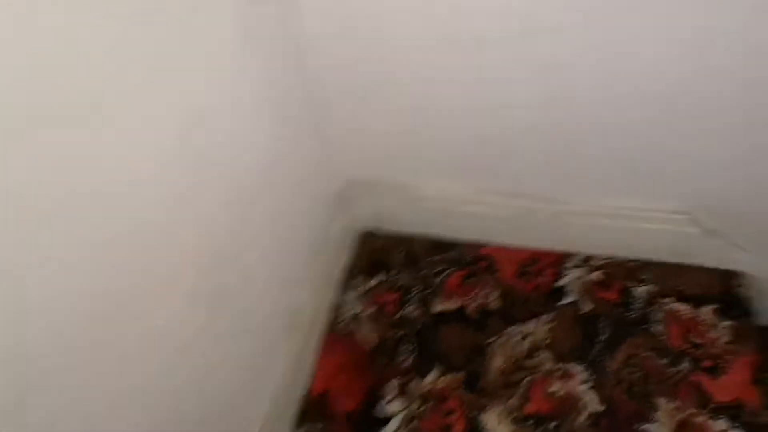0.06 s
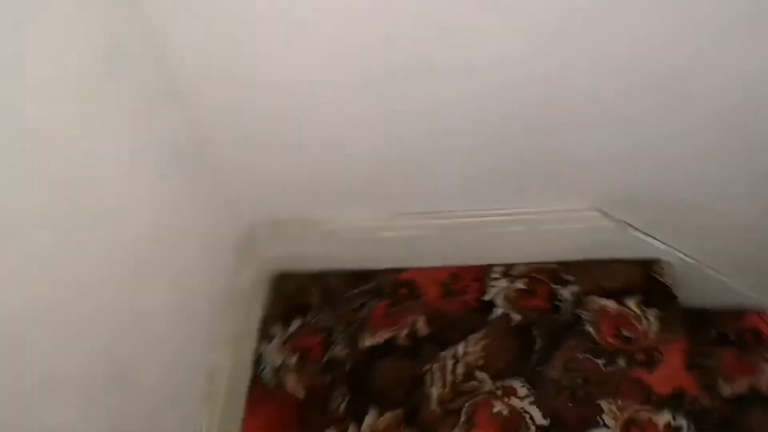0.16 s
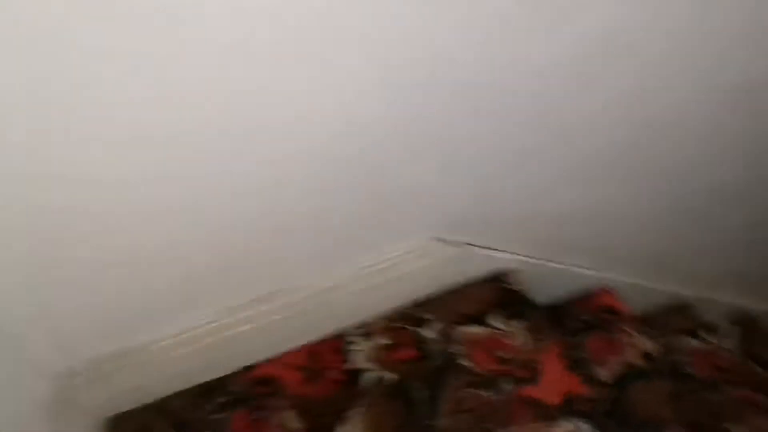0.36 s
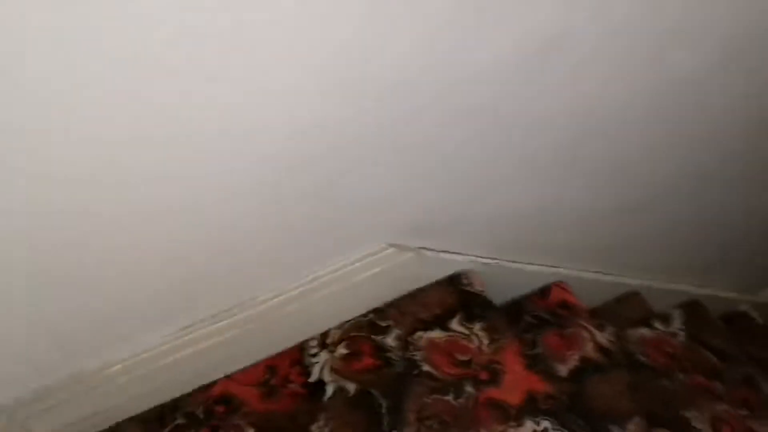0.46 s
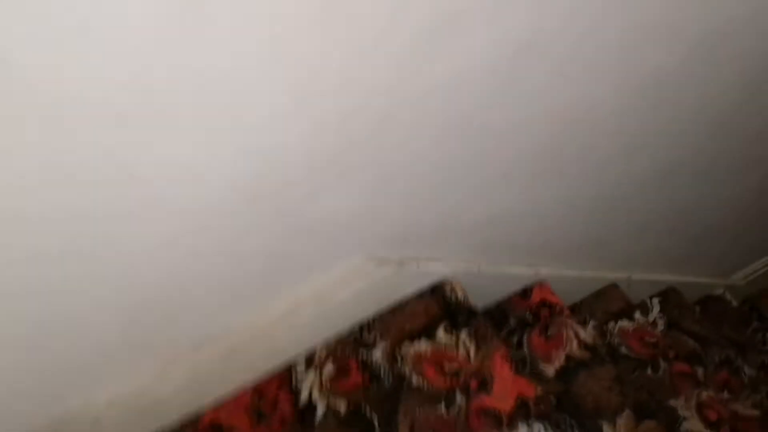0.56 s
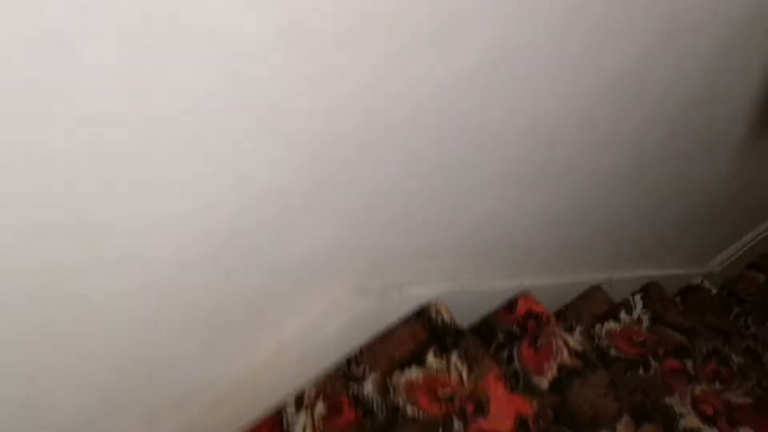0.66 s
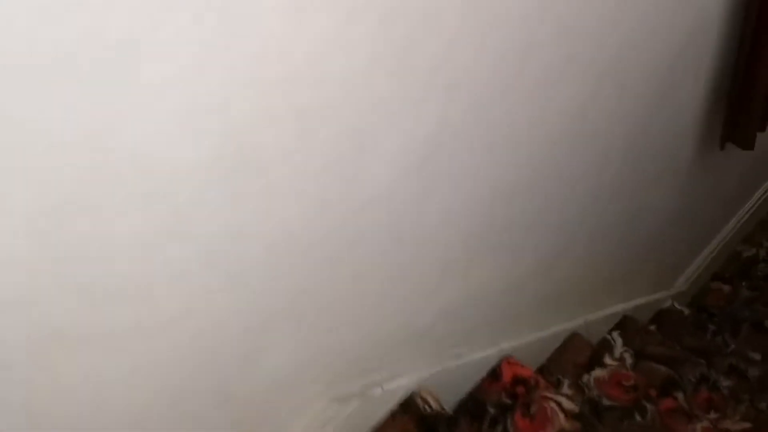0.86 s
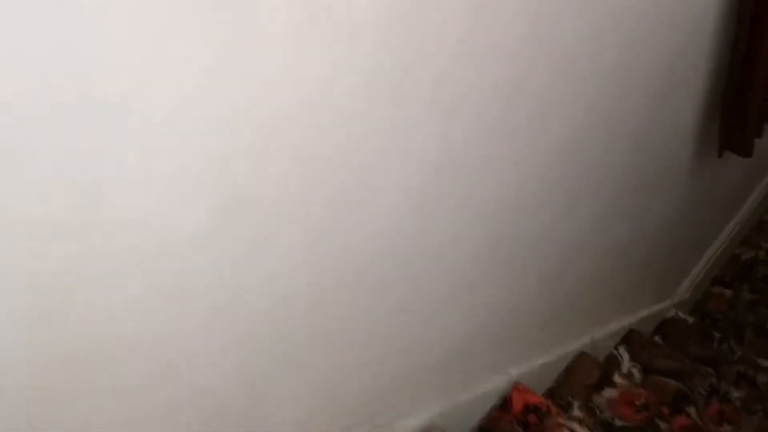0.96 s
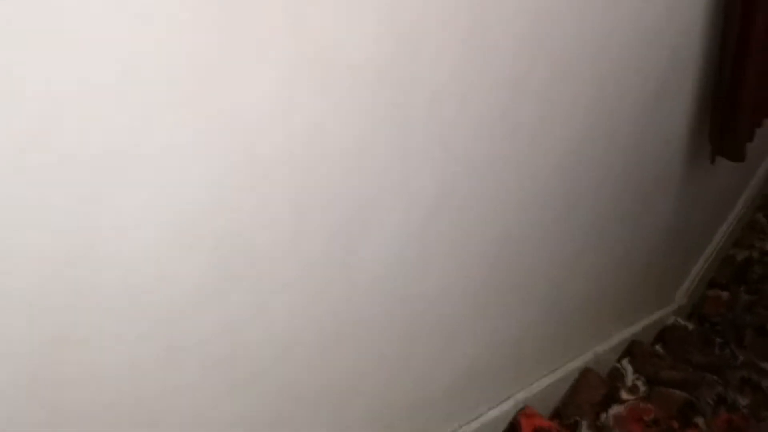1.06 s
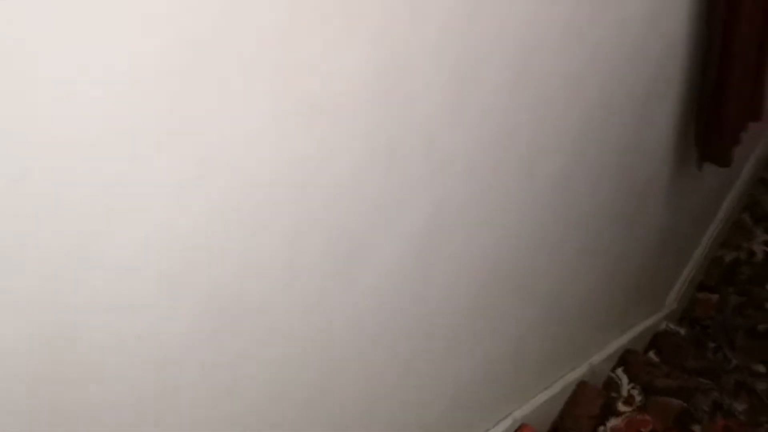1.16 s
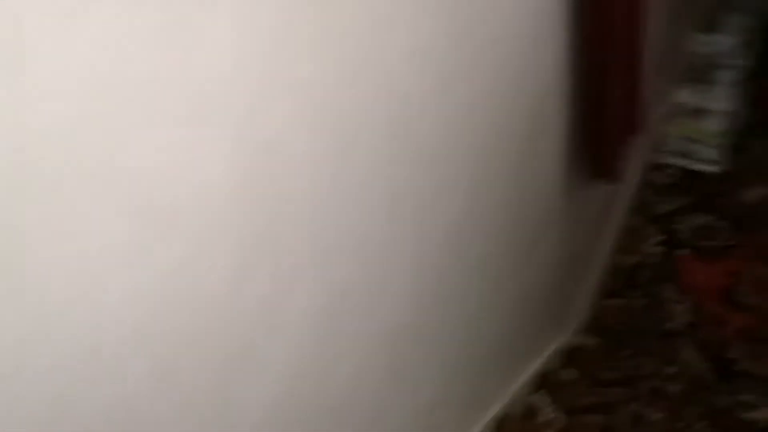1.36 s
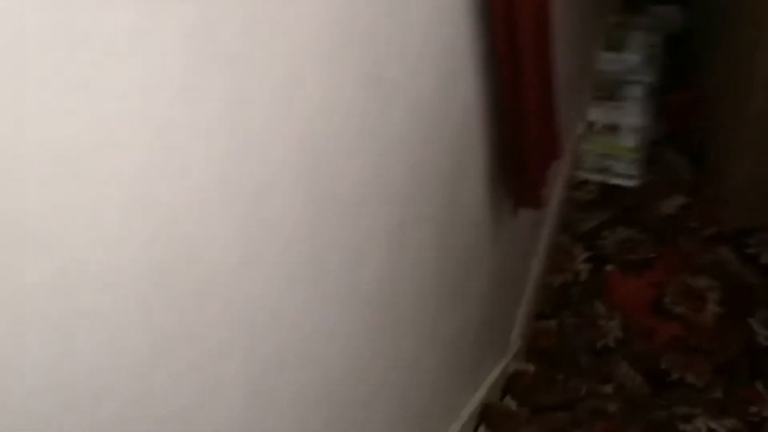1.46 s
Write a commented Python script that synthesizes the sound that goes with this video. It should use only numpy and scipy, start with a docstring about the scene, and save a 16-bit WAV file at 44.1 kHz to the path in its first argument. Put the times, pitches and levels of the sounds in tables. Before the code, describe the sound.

Two footsteps go down a carpeted wooden staircase in a quiet house. At 0.2 seconds the first lands with a deep thump, and the boards rumble as the sole scuffs. The second lands at 0.8 seconds, followed at once by a sharp double crack of wood that rings briefly in the stairwell. Softer thuds and clothing rustle continue until about 1.5 seconds, over faint hiss and rumble.

```python
"""Two steps down a carpeted wooden staircase in a quiet house.
Clothes rustle over faint hiss and rumble. At 0.2 s the first footfall makes the flight boom, and
the boards grumble as weight rolls over them; soles scuff, cloth ticks. The second step lands at
0.8 s and at 0.87 s a joint lets off a sharp double crack that rings in the narrow stairwell.
Softer thuds and rustles follow until 1.5 s."""
import sys
import numpy as np
from scipy import signal
from scipy.fft import rfft, irfft
from scipy.io import wavfile

SR = 44100
rng = np.random.default_rng(int(sys.argv[2]) if len(sys.argv) > 2 else 0)


def to_wav(sig):
    """Store sig (one row per channel, or 1-D mono) as 16-bit WAV at the path in sys.argv[1].

    Samples outside -1..1 are clipped; the rate is SR.
    """
    pcm = np.clip(np.atleast_2d(sig), -1, 1) * 32767
    pcm = np.round(pcm).astype(np.int16)
    wavfile.write(sys.argv[1], SR, pcm.T)  # frames by channels


N = 66150
T = np.arange(N) / SR

# swings of the loaded flight: start_s, peak_db, pitch_hz, swell_s
FLIGHT_SWINGS = [(0.1931, -20.5, 49, 0.03), (.775, -27, 44.6, 0.036), (0.307, -26, 48.1, 0.013),
                 (0.341, -34, 30.3, 0.023), (0.422, -34.5, 39.9, 0.016), (0.481, -38.5, 31.6, 0.011),
                 (.617, -44.5, 40.9, 0.028), (0.854, -36.5, 29.63, 0.035), (1.052, -36.5, 32.2, 0.019),
                 (1.231, -44, 40.5, 0.022)]
# heel and toe contacts: start_s, level_db, corner_hz
CONTACTS = [(0.195, -24, 124), (0.2295, -31, 126), (0.289, -44, 175), (0.354, -46, 200), (.847, -28, 127),
            (0.888, -48, 102), (1.062, -26.5, 55.5), (1.4, -48.5, 171)]
# board modes: pitch_hz, level_db, t60_s
BOARD_MODES = [(93.65, -5, 0.34), (124, -7, 0.096), (153.2, -6.5, 0.22), (186.6, -6, 0.25),
               (217, -14.5, 0.13), (256.4, -11.5, .25), (321, -19, 0.36), (407, -31.5, 0.038)]
# weight rolling over the boards: start_s, level_db, rise_s, hold_s, t60_s
WEIGHT_ROLLS = [(.215, -51.5, 0.013, 0.16, 0.13), (.78, -64, 0.069, 0.11, 0.16),
                (1.39, -67, 0.0067, 0.06, .3)]
# jerks of the joint: start_s, level_db, rise_s, t60_s, pan_db
JOINT_JERKS = [(.8726, -34, 0.0017, 0.01, -1), (.8752, -40.5, 0.002, 0.015, 3),
               (.8845, -41.5, 0.0031, 0.024, 8)]
# crack spectrum: freq_hz, gain_db
CRACK_SPECTRUM = [(200, -42), (550, -4), (850, -17.5), (1150, -3.5), (1550, -2), (1950, 6), (2500, -2.5),
                  (3000, -2), (3800, -7.5), (4500, 1), (5400, 3.5), (6400, -10), (7600, -1), (10000, -4),
                  (12000, -21), (15000, -59)]
# sole scuffs: start_s, level_db, rise_s, hold_s, t60_s
SCUFFS = [(.075, -79.5, 0.0059, 0.0053, 0.14), (.335, -61.5, 0.048, 0.023, 0.14),
          (.878, -66, .015, 0.01, 0.36), (1.061, -60.5, 0.0037, 0.003, 0.065),
          (1.075, -70.5, 0.014, 0.037, 0.08)]
# scuff spectrum: freq_hz, gain_db
SCUFF_SPECTRUM = [(100, -17), (220, -4.5), (320, 6), (480, -4), (620, -4), (850, -25), (2000, -34)]
# cloth sweeps as the legs move: start_s, level_db, rise_s, hold_s, t60_s, tilt_db_per_octave
CLOTH_SWEEPS = [(.0, -75, 0.0041, 0.088, 0.31, 0.5), (0.073, -67, 0.14, 0.02, 1, -2.5),
                (0.261, -63.5, 0.1, 0.056, .3, -2), (0.394, -65.5, 0.051, 0.042, 0.43, 0),
                (0.778, -65, 0.014, 0.015, 0.6, -1.5), (0.824, -59, 0.063, 0.0078, 0.45, 1),
                (0.919, -66.5, 0.065, 0.037, 0.15, 2), (1.033, -72, 0.015, 0.028, 0.47, -3),
                (1.187, -79.5, 0.014, 0.2, 0.22, -3.5)]
# rustle spectrum: freq_hz, gain_db
CLOTH_SPECTRUM = [(300, -5.5), (700, -3.5), (1200, -2), (1800, 6), (2300, 0), (2800, -2), (3500, -5.5),
                  (5500, -6), (8300, -5.5), (9600, -6.5), (11000, -18), (15000, -20.5)]
# rustle balance: freq_hz, pan_db
CLOTH_PAN = [(400, -0.5), (1200, -5.5), (2200, -4.5), (4000, 2), (8000, -2)]
# clothing ticks: start_s, level_db, rise_s, t60_s, pan_db
TICKS = [(.198, -71, 0.005, 0.21, -21), (.213, -56.5, 0.003, 0.018, 7), (.476, -67, 0.018, 0.046, -18),
         (.4853, -52.5, 0.00052, .013, 11), (.766, -60, .003, 0.017, -6),
         (.7752, -53.5, 0.00092, 0.021, -3), (.799, -71, 0.0044, .015, 0), (1.214, -66, 0.011, 0.023, -1),
         (1.464, -76.5, 0.0073, 0.039, 15)]
# tick spectrum: freq_hz, gain_db
TICK_SPECTRUM = [(300, -13.5), (700, -4.5), (1400, 7.5), (3200, -7.5), (6000, -2), (8200, 5),
                 (11500, -11.5), (15000, -7.5)]
# stairwell decay: freq_hz, t60_s
STAIRWELL_T60 = [(200, 0.33), (1000, 0.4), (2000, 0.39), (5000, 0.29), (8000, 0.31), (14000, 0.21)]
# stairwell balance: freq_hz, pan_db
STAIRWELL_PAN = [(400, -12), (1500, -9.5), (2500, -8), (4400, -1), (8000, -1)]
# house hiss spectrum: freq_hz, gain_db
HISS_SPECTRUM = [(60, 12.5), (110, 10.5), (170, 0), (290, -1.5), (420, -8.5), (650, -8.5), (1000, -6),
                 (1400, -6.5), (1850, -2), (2400, -6.5), (3300, -11), (4400, -13.5), (5600, -12.5),
                 (8000, -14.5), (11000, -23.5), (15500, -22)]
# hiss and scuff balance: freq_hz, pan_db
HOUSE_PAN = [(400, 0), (1500, -2.5), (4000, 1), (8000, 1)]
# house rumble spectrum: freq_hz, gain_db
RUMBLE_SPECTRUM = [(12, -28), (28, -5.5), (48, -17), (62, -20), (80, -40), (130, -32.5), (250, -104)]
# left-right likeness of the diffuse field: freq_hz, correlation
COHERENCE = [(60, .999), (130, 0.91), (290, 0.35), (640, -0.25), (1400, 0.13), (3000, -0.14), (7000, -0.03)]

SLIPS_PER_S = 900


def flight_boom(roundness=1.51):
    """The whole flight swells into a few slow swings under each load."""
    out = 0
    for start_s, peak_db, pitch_hz, swell_s in FLIGHT_SWINGS:
        age_s = np.maximum(T - start_s, 0)
        envelope = (age_s / swell_s * np.exp(1 - age_s / swell_s)) ** roundness
        out = out - from_db(peak_db) * envelope * np.sin(2 * np.pi * pitch_hz * age_s)
    return out


def board_grumble(slip_corner_hz=305, side_db=-19):
    """Foot contacts and many small slips ring the treads; higher modes are wider in stereo."""
    out, load = 0, swells(WEIGHT_ROLLS)
    force = sum(from_db(db) * foot_force(start_s, corner_hz) for start_s, db, corner_hz in CONTACTS)
    for pitch_hz, level_db, t60_s in BOARD_MODES:
        noise_gain = np.sqrt(t60_s * SR / np.log(1000) / 4)
        slips = ring(grains(SLIPS_PER_S, size_db=3) * load, pitch_hz, t60_s) / noise_gain
        mid, side = slips / np.hypot(1, pitch_hz / slip_corner_hz)
        width = from_db(side_db) * min(pitch_hz / BOARD_MODES[3][0], 2) ** 2
        thud = ring(force, pitch_hz, t60_s)
        out = out + from_db(level_db) * (mid + width * side * [[1], [-1]] - thud)
    return out


def foot_force(start_s, corner_hz):
    """Force pulse smoothed by carpet; area 1."""
    age = np.maximum(T - start_s, 0) * 2 * np.pi * corner_hz
    force = age ** 3 * np.exp(-age)
    return force / force.sum()


def joint_crack(reverb_db=-1.5):
    """A joint lets go in quick jerks that fill the stairwell."""
    direct = colour(bursts(JOINT_JERKS), CRACK_SPECTRUM)
    return direct + from_db(reverb_db) * stairwell(direct)


def sole_scuffs():
    """Soles rub the pile: dull, grainy."""
    friction = spread(grains(SLIPS_PER_S, size_db=2), HOUSE_PAN)
    return colour(friction * swells(SCUFFS), SCUFF_SPECTRUM)


def cloth_rustle(grains_per_s=3300, pivot_hz=3000, flutter_db=1, flutter_hz=35.5):
    """Cloth rubs in fine grains; each sweep has its own brightness."""
    friction = spread(grains(grains_per_s, size_db=2), CLOTH_PAN)
    spectrum = rfft(colour(friction, CLOTH_SPECTRUM))
    octaves = np.log2(np.maximum(np.fft.rfftfreq(N, 1 / SR), 500) / pivot_hz)
    rustle = 0
    for *shape, tilt_db_per_octave in CLOTH_SWEEPS:
        tilted = irfft(spectrum * from_db(tilt_db_per_octave * octaves), N)
        rustle = rustle + np.roll(tilted, rng.integers(N), axis=1) * swells([shape])
    return rustle * from_db(flutter_db * flutter(flutter_hz))


def cloth_ticks(reverb_db=-6):
    """Small bright ticks of clothing, reflected in the stairwell."""
    direct = colour(bursts(TICKS), TICK_SPECTRUM)
    return direct + from_db(reverb_db) * stairwell(direct)


def stairwell(x, build_s=0.022, early_db=8, early_t60_s=0.076):
    """Dense reflections off close plaster walls, then a tail that dies band by band."""
    noise = spread(rng.standard_normal((2, N)), STAIRWELL_PAN)
    early = from_db(early_db) * decay(0, early_t60_s)
    edges_hz = np.geomspace(150, 16000, 9)
    response = 0
    for low_hz, high_hz in zip(edges_hz, edges_hz[1:]):
        band = signal.sosfilt(signal.butter(2, [low_hz, high_hz], "band", fs=SR, output="sos"), noise)
        late = decay(0, at_hz(STAIRWELL_T60, np.sqrt(low_hz * high_hz)))
        response = response + band * (late + early)
    response = rms_one(response * np.minimum(T / build_s, 1)) / np.sqrt(N)
    return signal.fftconvolve(x, response, axes=1)[:, :N]


def house_background(hiss_db=-66, rumble_db=-55):
    """Faint hiss over a low mono rumble."""
    hiss = colour(spread(rng.standard_normal((2, N)), HOUSE_PAN), HISS_SPECTRUM)
    rumble_gain = from_db(at_hz(RUMBLE_SPECTRUM, np.fft.rfftfreq(N, 1 / SR)))
    rumble = irfft(rfft(rng.standard_normal(N)) * rumble_gain, N)
    return from_db(hiss_db) * rms_one(hiss) + from_db(rumble_db) * rms_one(rumble)


def ring(x, pitch_hz, t60_s):
    """Damped mode; a unit click rings a sine of height 1."""
    radius, angle = from_db(-60 / (t60_s * SR)), 2 * np.pi * pitch_hz / SR
    return signal.lfilter([0, np.sin(angle)], [1, -2 * radius * np.cos(angle), radius ** 2], x + 1e-18)


def grains(per_s, size_db):
    """Two random trains of uneven clicks; rms 1."""
    clicks = (rng.random((2, N)) < per_s / SR) * rng.choice([-1, 1], (2, N))
    sizes = from_db(size_db * np.minimum(rng.exponential(1, (2, N)), 4))
    return rms_one(clicks * sizes)


def bursts(rows):
    """One short burst of friction noise per row."""
    envelope = sum(swells([(start_s, level_db, rise_s, 0, t60_s)]) * pan(pan_db)
                   for start_s, level_db, rise_s, t60_s, pan_db in rows)
    return rng.choice([-1, 1], (2, N)) * envelope


def swells(rows):
    """Rise-hold-release envelopes, added in power."""
    power = 0
    for start_s, level_db, rise_s, hold_s, t60_s in rows:
        release_s = start_s + rise_s + hold_s
        rise = np.clip((T - start_s) / rise_s, 0, 1)
        release = np.maximum(T < release_s, decay(release_s, t60_s))
        power = power + (from_db(level_db) * rise * release) ** 2
    return np.sqrt(power)


def decay(start_s, t60_s):
    """Exponential decay; zero before start_s."""
    return (T >= start_s) * np.exp(-np.log(1000) * np.maximum(T - start_s, 0) / t60_s)


def flutter(corner_hz):
    """Low-passed random wobble; rms 1."""
    rolloff = 1 + (np.fft.rfftfreq(N, 1 / SR) / corner_hz) ** 2
    return rms_one(irfft(rfft(rng.standard_normal(N)) / rolloff, N))


def colour(x, spectrum):
    """Minimum-phase filter; white noise keeps its power."""
    size = 2 * N
    gain = rms_one(from_db(at_hz(spectrum, np.fft.rfftfreq(size, 1 / SR))))
    cepstrum = irfft(np.log(gain))
    cepstrum[1:N] *= 2
    cepstrum[N + 1:] = 0
    return irfft(rfft(x, size) * np.exp(rfft(cepstrum)))[..., :N]


def spread(pair, pans):
    """Two unrelated signals to a diffuse stereo field, alike in the bass."""
    freq_hz = np.fft.rfftfreq(N, 1 / SR)
    correlation = np.clip(at_hz(COHERENCE, freq_hz), -1, 1)
    mid, side = rfft(pair)
    stereo = np.sqrt(1 + correlation) * mid + np.sqrt(1 - correlation) * side * [[1], [-1]]
    return irfft(stereo * pan(at_hz(pans, freq_hz)), N)


def pan(pan_db):
    """Channel gains; pan_db is left minus right."""
    return from_db(np.array([[.5], [-.5]]) * pan_db)


def at_hz(table, freq_hz):
    """Interpolate along log frequency."""
    knots_hz, values = np.transpose(table)
    return np.interp(np.log(freq_hz + 1), np.log(knots_hz), values)


def from_db(db):
    """Decibels to gain."""
    return 10 ** (np.asarray(db) / 20)


def rms_one(x):
    """Scale to rms 1."""
    return x / np.sqrt(np.mean(x ** 2) + 1e-30)


def scene():
    """Steps, crack, clothes and house, summed."""
    steps = flight_boom() + board_grumble() + sole_scuffs()
    return steps + joint_crack() + cloth_rustle() + cloth_ticks() + house_background()


def record(dry):
    """Steep elliptic low-pass."""
    cutoff_hz = 15700
    return signal.sosfilt(signal.ellip(10, .1, 80, cutoff_hz, fs=SR, output="sos"), dry)


dry = scene()
out = record(dry)
to_wav(out)
```